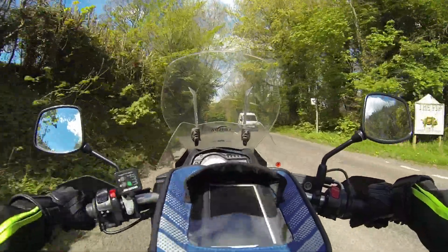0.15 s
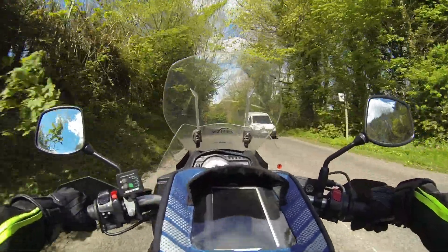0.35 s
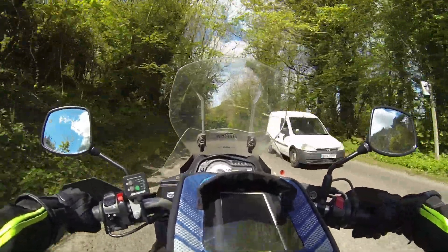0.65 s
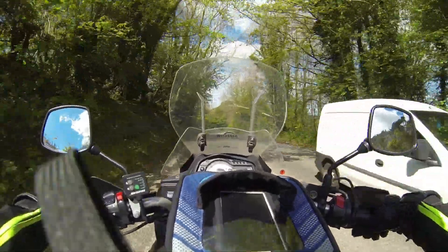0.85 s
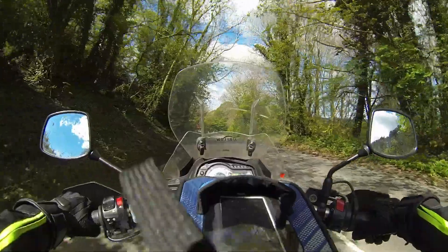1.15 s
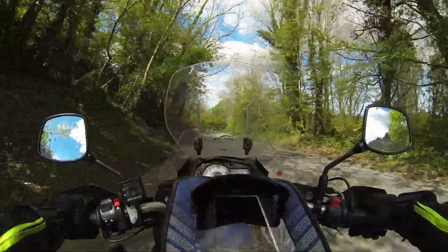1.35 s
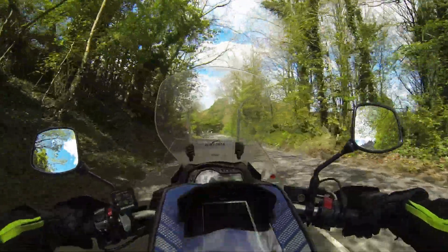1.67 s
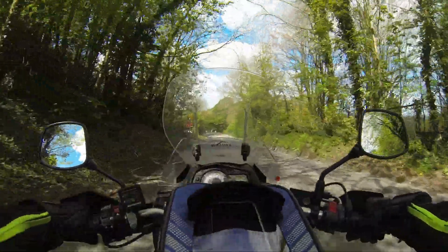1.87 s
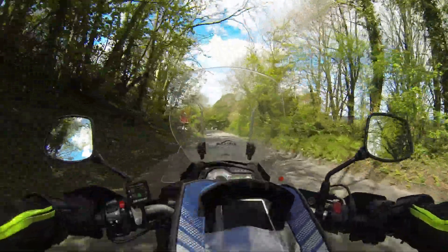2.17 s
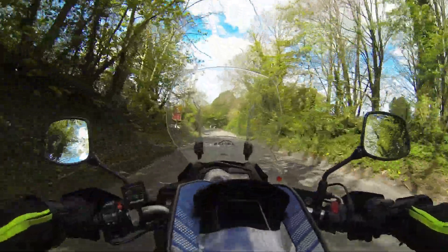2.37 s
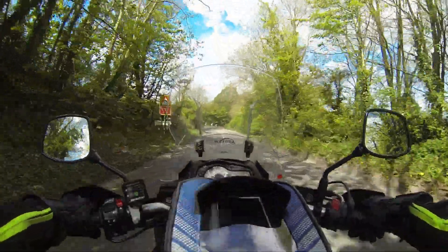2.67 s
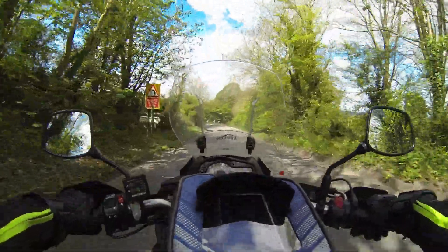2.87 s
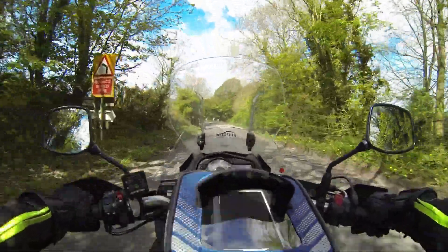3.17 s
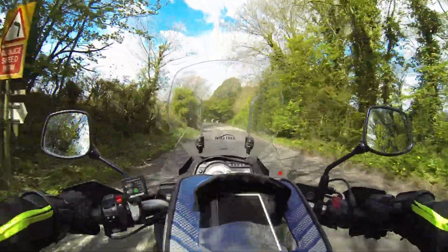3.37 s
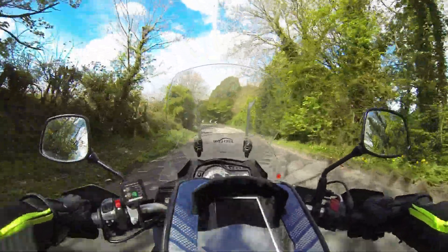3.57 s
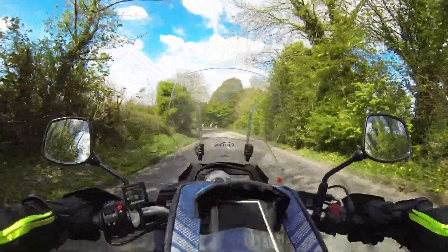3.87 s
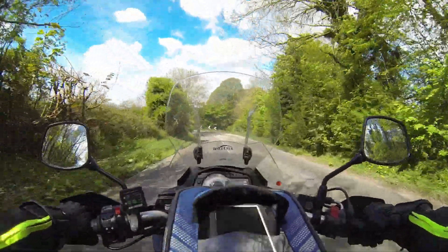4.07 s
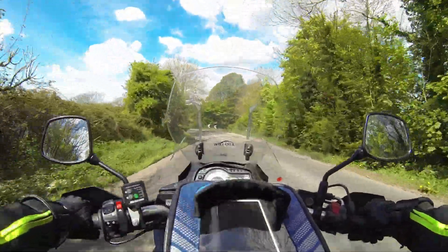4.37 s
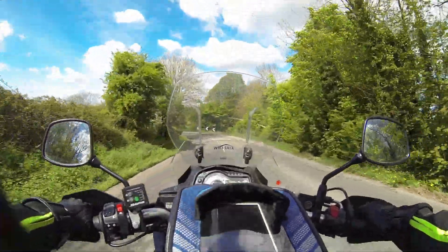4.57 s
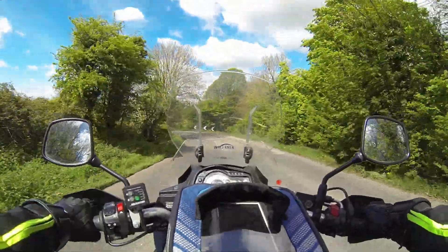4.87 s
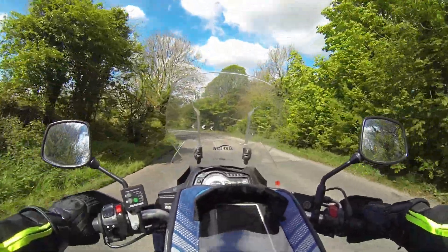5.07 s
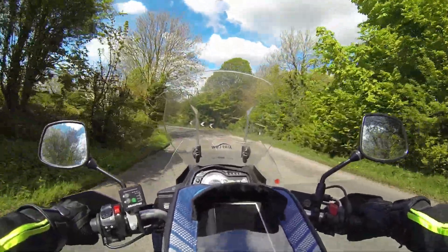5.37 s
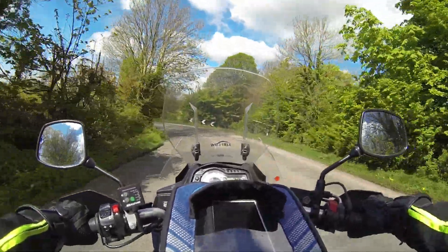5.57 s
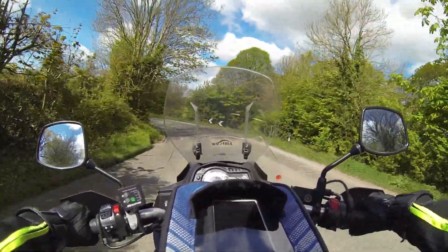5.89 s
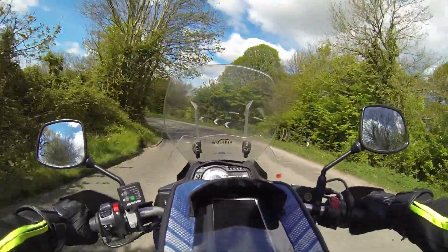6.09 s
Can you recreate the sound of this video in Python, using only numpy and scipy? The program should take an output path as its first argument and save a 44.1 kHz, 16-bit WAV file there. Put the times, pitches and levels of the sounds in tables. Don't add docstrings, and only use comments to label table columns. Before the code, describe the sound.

Close, boxy and muffled sound of riding a motorcycle on an open country lane. Wind thumps the microphone's plastic housing in lumps and hisses through its seams. Sharp, dry plastic clacks come in uneven clusters, with tiny rattles, ticks and a faint metallic ring. Softer low strap slaps fill the gap around three to four seconds. The engine hum sinks, then rises, with faint gliding drive whines underneath.

```python
import sys
import numpy as np
from scipy import signal
from scipy.fft import rfft, irfft
from scipy.io import wavfile
from scipy.ndimage import uniform_filter1d, minimum_filter1d

SR = 44100
rng = np.random.default_rng(int(sys.argv[2]) if len(sys.argv) > 2 else 0)


def dump(signal):
    limited = np.clip(np.atleast_2d(signal).T, -1, 1)
    pcm = np.round(limited * 32767).astype(np.int16)
    wavfile.write(sys.argv[1], SR, pcm)


def linear_from_db(decibels):
    return 10 ** (np.asarray(decibels, float) / 20)


N = 274743


def evened(x):
    return x / np.sqrt(np.mean(x ** 2) + 1e-20)


def read(points, hz):
    f, value = np.transpose(points)
    return np.interp(np.log(hz + 1), np.log(f + 1), value, left=-90, right=-90)


def bumps(table, hz):
    return sum(db / (1 + (2 * (hz - f) / width) ** 2) for f, width, db in table)


def curve(table, column):
    rows = np.array(table)
    return np.interp(np.arange(N) / SR, rows[:, 0], rows[:, column])


def resonate(x, hz, width):
    r = np.exp(-np.pi * width / SR)
    return signal.lfilter([1 - r, 0, r - 1], [1, -2 * r * np.cos(2 * np.pi * hz / SR), r * r], x)


def resonate_twice(x, hz, width):
    return resonate(resonate(x, hz, width), hz, width)


def ring_modes(x, table, widen=1):
    return sum(linear_from_db(db) * resonate_twice(x, hz, widen * width) for hz, width, db in table)


def wander(rate_hz):
    z = rfft(rng.standard_normal(N))
    return evened(irfft(z / (1 + (np.fft.rfftfreq(N, 1 / SR) / rate_hz) ** 4), N))


def noise(shape_db, patchy_db, size=1024):
    frames = N * 4 // size + 5
    a, b, patches = rng.standard_normal((frames, size // 2 + 1, 3)).T
    patches = uniform_filter1d(patches, size=8, axis=0)
    patches = evened(uniform_filter1d(patches, size=8, axis=1))
    colour_db = shape_db(np.fft.rfftfreq(size, 1 / SR))[:, None]
    z = (a + 1j * b) * linear_from_db(colour_db + patchy_db * patches)
    return evened(signal.istft(z, nperseg=size, noverlap=size * 3 // 4)[1][:N])


def causal(gain_db):
    log_gain = np.log(linear_from_db(np.maximum(np.r_[gain_db, gain_db[-2:0:-1]], -80)))
    taps = np.fft.ifft(np.exp(log_gain - 1j * signal.hilbert(log_gain).imag)).real[:1024]
    return taps / np.linalg.norm(taps)


# (time [s], peak level [dB], cavity share [dB], tick share [dB])
EDGE_CLACKS = [(0.229, -6, -9.5, -15.5), (0.9155, -0.5, -11, -20.5), (0.9416, -23, -4, -16),
               (0.9468, -17, -7, -17), (1.0184, -10, -8, -19.5), (1.1397, -32, -11, -18),
               (1.237, -20.5, 0, -22), (1.3712, -37.5, 4, -13), (1.4452, -3.5, -5.5, -17.5),
               (1.4532, -16, -12, -21), (1.7386, -8, -10, -16.5), (1.8306, -20, -10, -20),
               (2.048, -2.2, -12, -17.5), (2.088, -14, -3.5, -13.5), (2.3035, -2.7, -16.5, -17),
               (2.3669, -35, -11, -14), (2.577, -37, -19, -15), (2.607, -34, -11, -10),
               (3.1105, -32, 1.5, -12), (3.196, -1.1, -9, -21), (3.378, -29, -2, -19),
               (4.4762, -.9, -8, -17), (4.5501, -15, -11, -21), (5.0763, 1.5, -8.5, -20.5),
               (5.836, -2.6, -5, -14), (5.854, -1.5, -14, -34), (5.8897, -21, 3, -17),
               (0.6614, -41, 11, -18), (0.791, -32, 4, -17)]
# (time [s], peak level [dB], cavity share [dB])
FLAT_BOUNCES = [(0.2464, -22, -10), (0.281, -34, -15), (0.323, -35.5, -5), (1.2224, -19, -6),
                (1.2296, -20, -2), (1.4565, -26, 5), (1.4626, -20, -1), (1.762, -30, 0), (1.7735, -26, -17),
                (1.8424, -26, -11), (2.071, -28, 5), (2.1193, -19, -9), (2.1258, -23, -6),
                (2.172, -29.5, -5), (2.335, -22.5, 0), (2.4515, -35, -3), (3.825, -40, 8.5),
                (3.857, -36.5, 11.5), (3.993, -23, -22), (4.2135, -31, -1), (4.492, -15, -5),
                (4.5023, -34.5, 10), (4.5194, -35, 4.5), (5.878, -30, 9), (5.1314, -33, -5),
                (5.139, -28, -13), (5.845, -21, -10), (5.8634, -27, 5), (5.87, -29.5, 9),
                (5.97, -31.5, -4.5)]
# (time [s], knock level [dB], cavity share [dB], clack share [dB])
PADDED_KNOCKS = [(0.0775, -44, -.4, -8), (0.675, -44, 8, 9), (0.7016, -32, 3.5, -18), (1.0035, -43, 9, 2.2),
                 (1.1153, -28.5, -15, -9), (1.15, -46, 7, 13), (1.1686, -35, 7, -3),
                 (1.223, -23.5, -22, -12), (1.961, -20, 1, -25), (2.4434, -24.5, 3, -20),
                 (2.7076, -30, -.4, -22), (2.8894, -36.5, 3.5, -13), (3.12, -35.5, 1, -7),
                 (3.158, -40, -1.2, -11), (3.2187, -33, 3, -8), (3.239, -43, 7, -3), (3.493, -33, -5, -28),
                 (3.569, -40, 5.5, -19), (3.7626, -27, 1, -31), (4.005, -39.5, -4, -5),
                 (4.0623, -33.5, -7, -20), (4.4075, -38, 2, -11), (4.6235, -29.5, -.6, -9),
                 (4.8558, -27, 0, -12), (5.189, -46.5, 5, 14), (5.2048, -38, 13, -11),
                 (5.3355, -55, 14, 15), (5.573, -41, -10, -13), (6.0657, -47, 8, 7), (6.202, -56, 9, 20),
                 (1.525, -41, -3, -15), (5.727, -41.5, 0, -10)]


def contacts():
    rows = []
    for s, db, air, tick in EDGE_CLACKS:
        rows.append((s, db, -31.5 + 0.5 * db, db + air, db + tick, 0.0068 + 0.00005 * db))
    for s, db, air in FLAT_BOUNCES:
        rows.append((s, db - 3, db - 26.5, db + air, db - 37, 0.0069))
    for s, db, air, clack in PADDED_KNOCKS:
        rows.append((s, db + clack, db, db + air, db + clack - 24, 0.0047))
    return rows


# (frequency [Hz], level [dB])
CLACK_COLOUR = [(290, -105), (500, -49), (911, 3.5), (1430, -4.5), (2320, 0), (2850, -5.5), (3550, -7),
                (4620, -18.5), (5100, -10), (5800, -9.5), (6560, -9.5), (7170, -8.5), (7900, -15),
                (10000, -21), (11400, -33.5), (16500, -34)]
# (frequency [Hz], width [Hz], level [dB])
SHELL_SPOTS = [(2090, 90, -7), (2340, 160, 3), (3000, 90, -5), (3480, 90, -6), (2640, 110, -14),
               (3730, 260, 5), (4380, 110, -7), (6520, 200, -14), (15800, 3500, -9)]
# (frequency [Hz], width [Hz], level [dB])
KNOCK_MODES = [(460, 290, -7.5), (673, 99, 3.5), (802, 149, 3.5), (1115, 110, -2), (2310, 1100, -13)]
# (frequency [Hz], width [Hz], level [dB])
STRUCK_AIR = [(1263, 136, -3), (1550, 335, 9)]
# (time [s], body level [dB], tick level [dB])
REBOUNDS = [(.2301, -10, -24), (.2312, -9, -28), (.2324, -6, -30), (.2338, -14, -36), (.2466, -15, -40),
            (.9165, -4, -24), (.9178, -8, -28), (.9192, -10, -32), (1.0197, -12, -32), (1.0212, -16, -36),
            (1.4458, -3, -20), (1.4475, -11, -28), (1.4491, -9, -36), (1.4503, -9, -33), (1.4517, -13, -34),
            (1.4537, -16, -40), (1.4565, -15, -42), (1.4574, -15, -48), (1.4627, -15, -44),
            (1.7401, -10, -31), (1.7412, -14, -24), (1.7423, -8, -28), (1.7437, -12, -34),
            (1.7447, -16, -42), (2.0487, -8, -17), (2.0499, -5, -27), (2.051, -6, -28), (2.0532, -8, -34),
            (2.0557, -12, -40), (2.3056, -10, -22), (2.3088, -10, -32), (3.1965, -2, -20),
            (3.1978, -7, -28), (3.1988, -6, -27), (3.2005, -9, -34), (4.4774, -7, -27), (4.4785, -9, -16),
            (4.4796, -3, -20), (4.4813, -8, -26), (4.4827, -10, -29), (4.4928, -11, -40),
            (4.4953, -15, -50), (5.0767, -4, -16), (5.078, -4, -27), (5.0791, -8, -29), (5.0813, -9, -27),
            (5.0824, -11, -34), (5.8376, -5, -27), (5.8388, -5, -21), (5.8405, -15, -30), (5.8553, -2, -31),
            (5.8563, -9, -37), (1.2226, -13, -36), (1.2298, -12, -34), (2.0884, -15, -25),
            (2.0892, -14, -26), (.9417, -14, -32), (4.5502, -20, -38), (4.5527, -20, -42),
            (5.8901, -19, -33)]


def buckle():
    size = 1500
    t, hz = np.arange(size) / SR, np.fft.rfftfreq(4096, 1 / SR)
    touches = contacts()
    chatter = np.tanh(1.25 * rng.standard_normal((len(touches), size)))
    clack, knock, air, tick = np.zeros((4, N + size))
    push = (t / 0.00035) * np.exp(-t / 0.00029)
    settle = 0.018 * np.exp(-t / 0.012)
    for (s, clack_db, knock_db, air_db, tick_db, length), shake in zip(touches, chatter):
        start = round(s * SR)
        at, length = slice(start, start + size), max(length, 0.001)
        pressure = (1 + 1.27 * np.exp(-t / 0.00033)) * np.exp(-(t / length) ** 2.67) + settle
        clack[at] += linear_from_db(clack_db - 13) * shake * pressure
        clack[start + 6] += 3.8 * linear_from_db(clack_db)
        air[at] += linear_from_db(air_db + 13.5) * shake * pressure * np.exp(-t / 0.006)
        tick[at] += linear_from_db(tick_db + 6.5) * shake * np.exp(-t / (0.22 * length))
        knock[at] += linear_from_db(knock_db + 30) * (push + 0.5 * shake * np.exp(-t / 0.003))
    for s, body_db, tick_db in REBOUNDS:
        clack[round(s * SR)] += 4 * linear_from_db(body_db)
        tick[round(s * SR)] -= 4 * linear_from_db(tick_db)

    colour = read(CLACK_COLOUR, hz) + bumps(SHELL_SPOTS, hz)
    split = 1 / (1 + (hz / 4700) ** 12)
    body_db = colour + 20 * np.log10(split / (1 + (1750 / (hz + 1)) ** 6))
    tick_colour_db = colour + 20 * np.log10(1 - split + 1e-5)
    out = signal.oaconvolve(clack, causal(body_db))[:N + size]
    out += signal.oaconvolve(tick, causal(tick_colour_db))[:N + size]
    out += ring_modes(air, STRUCK_AIR)
    thud = ring_modes(knock, KNOCK_MODES)
    thud += linear_from_db(-38) * resonate(knock, 600, 1200)
    dull = signal.butter(4, 3200, fs=SR, output="sos")
    return (out + signal.sosfilt(dull, thud))[:N]


# (frequency [Hz], width [Hz])
PANEL_MODES = [(960, 200), (1890, 260), (3250, 320), (3720, 270)]
# (time [s], then the peak level of each panel [dB])
LANDINGS = [(.2294, -36, -22, -18.5, -22), (.9157, -31, -8, -17, -12), (1.0189, -32, -12, -23, -24),
            (1.4451, -24, -5.5, -21, -20), (1.4562, -42, -12, -26, -34), (1.4621, -42, -16, -30, -30),
            (1.739, -40, -19, -15, -20), (2.0483, -20.5, -12, -10, -11), (2.3033, -37, -15, -12, -12),
            (3.1963, -36, -16, -14, -8), (4.4783, -25, -13, -7, -12), (4.4844, -38, -19, -25, -20),
            (4.4934, -39, -21, -24, -26), (5.0768, -30, -15, -12, -10), (5.0815, -34, -19, -16, -17.5),
            (5.8368, -34, -15, -14, -12), (5.8465, -40, -21, -30, -26), (5.8545, -37, -15, -16, -21),
            (5.866, -42, -23, -32, -30), (2.451, -33.5, -31, -30, -35), (4.0, -33, -31, -36, -37),
            (4.631, -42, -36, -38, -39), (0.9475, -40, -28, -21, -26), (5.202, -34, -36, -44, -44),
            (1.2235, -34, -28, -30, -30), (1.238, -34, -24, -28, -30), (3.3785, -50, -44, -34, -28),
            (4.551, -44, -26, -28, -28), (1.272, -50, -44, -38, -40), (3.497, -34, -42, -48, -50),
            (1.114, -38, -32, -42, -44), (1.9625, -22, -32, -44, -48), (.703, -30, -42, -50, -50),
            (2.445, -27, -34, -44, -48), (5.114, -40, -30, -40, -44), (5.122, -42, -34, -38, -42),
            (5.19, -48, -44, -38, -36), (5.824, -42, -30, -38, -38), (5.872, -44, -26, -32, -34),
            (5.997, -48, -38, -42, -46)]


def panels():
    t, out = np.arange(900) / SR, np.zeros(N)
    scrape = (1 - np.exp(-t / 0.0005)) * np.exp(-(t / 0.0032) ** 2)
    shakes_of_all = rng.standard_normal((len(LANDINGS), len(PANEL_MODES), 900))
    for (s, *dbs), shakes in zip(LANDINGS, shakes_of_all):
        for db, (hz, width), shake in zip(dbs, PANEL_MODES, shakes):
            ring = resonate_twice(shake * scrape, hz, 1.2 * width)
            out[round(s * SR):][:900] += linear_from_db(db) * ring / abs(ring).max()
    return out


def flat():
    t, out = np.arange(600) / SR, np.zeros(N)
    fade = np.exp(-(t / 0.0045) ** 2)
    first_blow = 6 * (t < 0.0001)
    for (s, db, _), shake in zip(FLAT_BOUNCES, rng.standard_normal((len(FLAT_BOUNCES), 600))):
        out[round(s * SR):][:600] += linear_from_db(db + 2) * (shake + first_blow) * fade
    return resonate_twice(out, 2180, 980)


# (time [s], peak level [dB])
STRAP_SLAPS = [(0.7027, -30), (1.96, -17.5), (2.445, -18.5), (2.708, -25), (3.2185, -26), (3.378, -25),
               (3.493, -26), (3.567, -23), (3.762, -15), (4.006, -12.5), (4.404, -21), (4.623, -22),
               (4.855, -16.5), (5.059, -26)]


def strap():
    t, out = np.arange(900) / SR, np.zeros(N)
    slap = np.sin(2 * np.pi * 294 * t) * np.exp(-t / 0.0023)
    for s, db in STRAP_SLAPS:
        out[round(s * SR):][:900] -= linear_from_db(db + 1) * slap
    return out


# (frequency [Hz], level [dB], time to fade by 60 dB [s])
TONGUE_TONES = [(2525, 0, .19), (3545, -5, .17), (4290, -8, .15), (4990, -10, .09), (5480, -16, .1)]
# (time [s], level [dB])
TONGUE_BLOWS = [(.2288, -38), (0.9155, -32), (1.7381, -40), (2.0487, -31), (2.3036, -33), (3.196, -30.5),
                (3.376, -45), (4.477, -28), (5.0767, -30.5), (5.836, -34), (5.89, -42)]


def tongue():
    t, out = np.arange(8000) / SR, np.zeros(N + 8000)
    ring = sum(linear_from_db(db - 60 * t / t60) * np.sin(2 * np.pi * hz * t) for hz, db, t60 in TONGUE_TONES)
    for s, db in TONGUE_BLOWS:
        out[round(s * SR):][:8000] += linear_from_db(db) * ring
    return out[:N]


# (time [s], peak level [dB])
TONGUE_FLICKS = [
    (2.607, -34),
    (3.3783, -25),
    (2.2, -39),
    (4.632, -40),
]


def ping():
    t, out = np.arange(400) / SR, np.zeros(N)
    scratch = np.exp(-(t / 0.0046) ** 2)
    first_blow = 5 * (t < 0.0001)
    for (s, db), shake in zip(TONGUE_FLICKS, rng.standard_normal((len(TONGUE_FLICKS), 400))):
        out[round(s * SR):][:400] += linear_from_db(db + 4) * (shake + first_blow) * scratch
    flecks_per_s, fleck_db = 22, -46.5
    level_db = follow(fleck_db, 0.3, 0.6) + 3 * rng.standard_normal(N)
    jiggle = (rng.random(N) < flecks_per_s / SR) * linear_from_db(level_db)
    flecks = signal.oaconvolve(jiggle, scratch)[:N] * rng.standard_normal(N)
    return resonate_twice(out, 3700, 1100) + resonate_twice(flecks, 3300, 1300)


# (time [s], peak level [dB])
GRIT_TICKS = [(0.6633, -53), (0.79, -52), (0.806, -44), (1.078, -43), (1.141, -42), (1.1474, -42),
              (1.1604, -50), (1.1704, -51), (1.2225, -42), (1.2291, -35.5), (1.2434, -46), (1.2603, -46),
              (1.2904, -50), (1.3712, -45), (2.0877, -43), (2.2657, -54), (2.45, -41.5), (2.5844, -52),
              (2.9521, -50), (3.3776, -38), (3.438, -49), (4.5444, -46), (4.6313, -47), (5.0098, -48),
              (5.0499, -49), (5.1486, -53), (5.1876, -44.5), (5.2953, -50.5), (5.826, -43), (5.9526, -48),
              (.8155, -45), (1.112, -47), (1.354, -52), (1.4655, -44), (2.0805, -42), (2.405, -53),
              (2.53, -53), (2.64, -53), (5.97, -52), (1.268, -50), (1.378, -47), (1.152, -47), (4.597, -52),
              (6.02, -54), (6.032, -56), (6.108, -53), (6.204, -53)]


def grit():
    t, out = np.arange(400) / SR, np.zeros(N + 400)
    scratch = np.exp(-(t / 0.004) ** 2)
    for (s, db), shake in zip(GRIT_TICKS, rng.standard_normal((len(GRIT_TICKS), 400))):
        out[round(s * SR):][:400] += linear_from_db(db + 9.5) * shake * scratch
    return resonate_twice(out[:N], 7550, 1000)


# (time [s], gust level [dB], level of the flow through the seams [dB])
WIND = [(0.0, -34, -45), (0.36, -27.5, -41.5), (0.83, -23.5, -35.5), (1.04, -27, -34.5), (1.6, -27.5, -41),
        (1.9, -22, -37.5), (2.36, -27, -38), (2.91, -26, -38.5), (3.68, -30.5, -40.5), (3.87, -21, -37.5),
        (4.13, -31, -39), (4.42, -29.5, -37.5), (4.56, -38.5, -41.5), (5.0, -25.5, -37), (5.22, -38, -47),
        (5.7, -31, -39.5), (5.95, -33, -42.5), (6.23, -29, -42.5)]


def follow(db, per_gust, per_flow):
    typical_gust_db, typical_flow_db = -28, -39
    gust_db = curve(WIND, 1) - typical_gust_db
    flow_db = curve(WIND, 2) - typical_flow_db
    return db + per_gust * gust_db + per_flow * flow_db


# (frequency [Hz], level per Hz [dB])
BUFFET_COLOUR = [(8.8, -36), (15, 0), (48, -2.5), (86, -4), (107, -2), (140, -15), (215, -19), (260, -20),
                 (340, -27), (570, -120)]
# (frequency [Hz], level per Hz [dB])
ROAR_COLOUR = [(76, -19.5), (130, -4), (217, -11), (355, -19.5), (674, -23), (733, -21.5), (820, -34),
               (969, -31), (1200, -22.5), (1560, -30), (2640, -120)]


def wind():
    lumps = wander(20)
    buffet = noise(lambda hz: read(BUFFET_COLOUR, hz), 1.1, size=4096)
    buffet *= linear_from_db(curve(WIND, 1) + 2.1 * lumps)
    roar = noise(lambda hz: read(ROAR_COLOUR, hz), 1.0)
    roar *= linear_from_db(follow(-38.5, 0.41, 0.53) + 0.97 * lumps + 1.26 * wander(42.3))
    return buffet + roar


# (frequency [Hz], width [Hz], level [dB])
CAVITY_MODES = [(1349, 47, 2), (1515, 175, 8.5), (1860, 600, -27)]
# (frequency [Hz], level per Hz [dB])
FIZZ_COLOUR = [(1000, -24), (1700, -4), (1940, -5), (2630, -9), (4080, -18), (5170, -21.5), (5850, -25),
               (10700, -36), (13900, -40), (15150, -45), (15400, -80)]
# (frequency [Hz], width [Hz], level [dB])
SHELL_MODES = [(1870, 93, -11), (2700, 480, 4), (3680, 530, 3), (5170, 190, 9.5), (6500, 380, 6),
               (7680, 640, 8.5), (10240, 330, 7), (13600, 350, 5)]


def case_hiss():
    gusts = wander(26)
    air = rng.standard_normal(N) * linear_from_db(1.78 * gusts)
    cavity = evened(ring_modes(air, CAVITY_MODES, widen=1.3)) * linear_from_db(curve(WIND, 2) + 0.1)
    fizz = noise(lambda hz: read(FIZZ_COLOUR, hz) + bumps(SHELL_MODES, hz), 1.6)
    fizz *= linear_from_db(1.3 * gusts + 0.33 * wander(90))
    dust = (rng.random(N) < 25 / SR) * linear_from_db(3.9 * np.minimum(rng.exponential(1, N), 4))
    ticks = resonate(signal.oaconvolve(dust, rng.standard_normal(90))[:N], 10200, 900)
    fizz_rise_db = 0.45 * np.arange(N) / SR
    return cavity + (fizz + linear_from_db(-15) * ticks) * linear_from_db(follow(-53, 0.11, 0.85) + fizz_rise_db)


# (time [s], turns per second [Hz], firing level [dB], shake level [dB])
CRANK = [(0, 65, -14, -8), (.6, 72, -1.5, -10), (1.2, 72, -4, -16), (2.1, 66.5, -7, -5.5),
         (3.0, 57, -9, -8), (3.9, 58, -16, -21), (4.1, 67, -4, -6), (4.4, 78.6, -2.5, -3),
         (4.9, 77, -1, -4), (5.3, 74.3, -5.5, -2.5), (5.5, 72.4, -0.5, -8), (5.8, 69.5, -2.5, -6),
         (6.23, 66, -16, -12)]
# (multiple of the crank speed, rms level [dB])
FIRING_ORDERS = [(1.5, -41), (3, -44)]
# (multiple of the crank speed, rms level [dB])
SHAKE_ORDERS = [(2, -45), (4, -46.5), (6, -56)]
# (frequency [Hz], width [Hz], rms level [dB])
BRACKET_BUZZ = [(2315, 36, -62), (2544, 30, -59.5), (2620, 43, -57), (3480, 61, -67)]
# (start [s], end [s], start pitch [Hz], end pitch [Hz], rms level [dB])
WHINES = [
    (0.158, 1.297, 1500, 1415, -43),
    (3.3, 4.751, 735.6, 675.5, -51.5),
    (3.33, 4.099, 1466, 1410, -37),
    (5.05, 6.5, 651, 570, -57),
    (5.4, 6.4, 1302, 1190, -51.5),
    (2.8, 3.906, 113.8, 114.6, -38.5),
]


def engine():
    t, turns = np.arange(N) / SR, np.cumsum(curve(CRANK, 1)) / SR

    def order(multiple, db):
        return linear_from_db(db + 1.5 * wander(9)) * np.sin(2 * np.pi * (multiple * turns + rng.random()))

    out = linear_from_db(curve(CRANK, 2)) * sum(order(k, db) for k, db in FIRING_ORDERS)
    out += linear_from_db(curve(CRANK, 3)) * sum(order(k, db) for k, db in SHAKE_ORDERS)
    buzz = np.zeros(N)
    for hz, width, db in BRACKET_BUZZ:
        buzz += linear_from_db(db) * evened(resonate_twice(rng.standard_normal(N), hz, width))
    speed_db = 0.5 * (curve(CRANK, 1) - 70)
    out += buzz * linear_from_db(speed_db + 0.28 * curve(CRANK, 3) + 0.76 * (curve(WIND, 2) + 35))
    for start, end, start_hz, end_hz, db in WHINES:
        u = np.clip((t - start) / (end - start), 0, 1)
        hz = (start_hz + (end_hz - start_hz) * u) * (1 + 0.00289 * wander(25.4))
        swell = linear_from_db(db + 2.5 * wander(7)) * np.sin(np.pi * u) ** 0.4
        out += swell * np.sin(2 * np.pi * np.cumsum(hz) / SR)
    return np.sqrt(2) * out


def scene():
    blows = buckle() + panels() + flat() + strap() + tongue() + ping() + grit()
    return (blows + wind() + case_hiss() + engine())[None]


def low_pass(x):
    return signal.sosfilt(signal.butter(12, 16690, fs=SR, output="sos"), x)


def record(dry):
    peak_db = 20 * np.log10(-minimum_filter1d(-abs(dry[0]), size=700) + 1e-6)
    fall = np.arange(N) * 11.4 / SR
    excess_db = np.clip(peak_db + 2, -40, 3)
    over_db = np.maximum(np.maximum.accumulate(excess_db + fall) - fall, 0)
    ducked = dry * linear_from_db(-uniform_filter1d(over_db, size=100))
    ducked /= (1 + (ducked / 0.98) ** 8) ** 0.125
    ducked += linear_from_db(-81) * np.sin(2 * np.pi * 11000 * np.arange(N) / SR)
    ducked *= np.minimum(np.arange(N)[::-1] / 120, 1)
    edge = signal.butter(12, 15500, fs=SR, output="sos")
    return low_pass(signal.sosfilt(edge, ducked))


dry = scene()
out = record(dry)
dump(out)
```